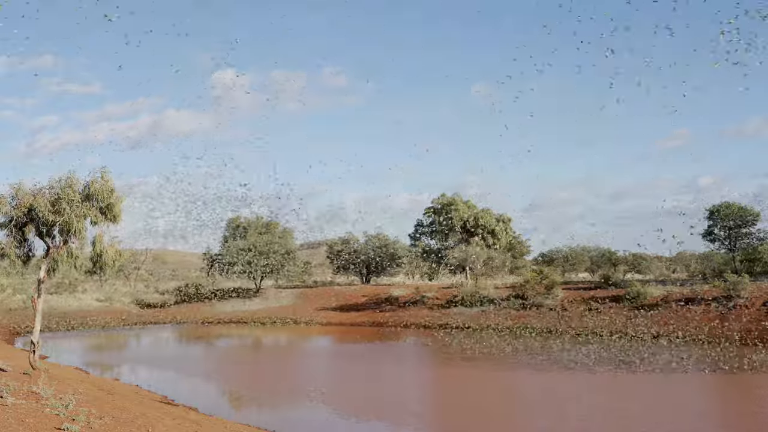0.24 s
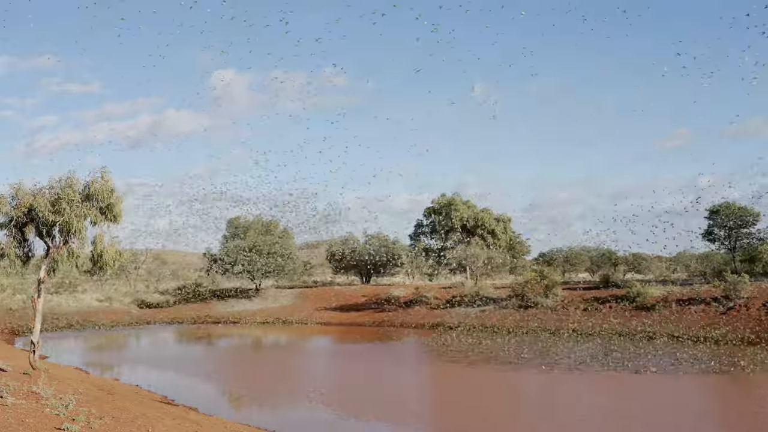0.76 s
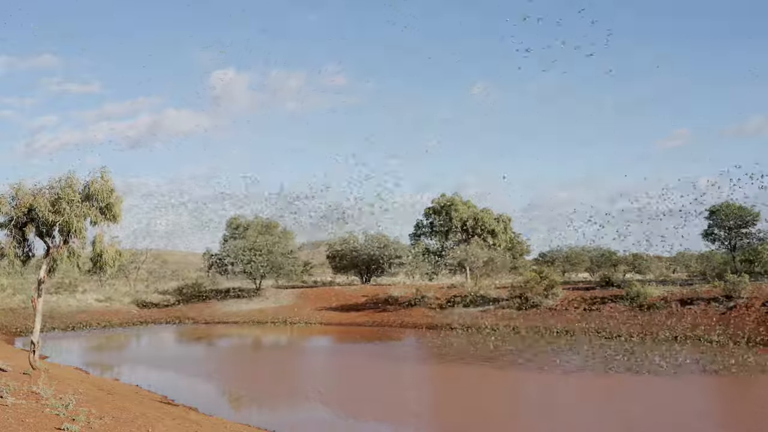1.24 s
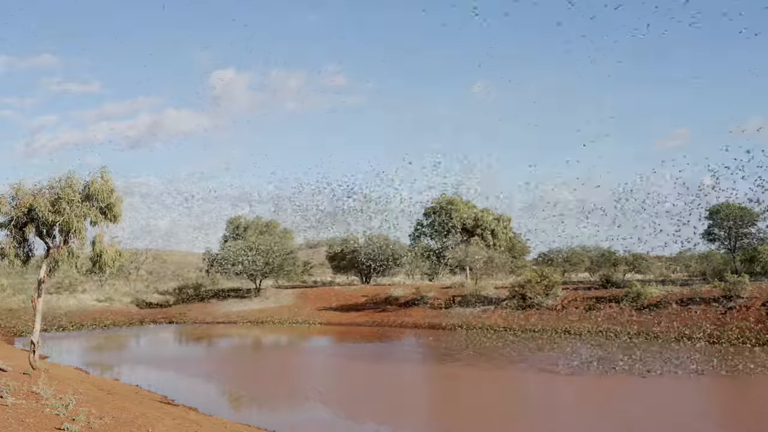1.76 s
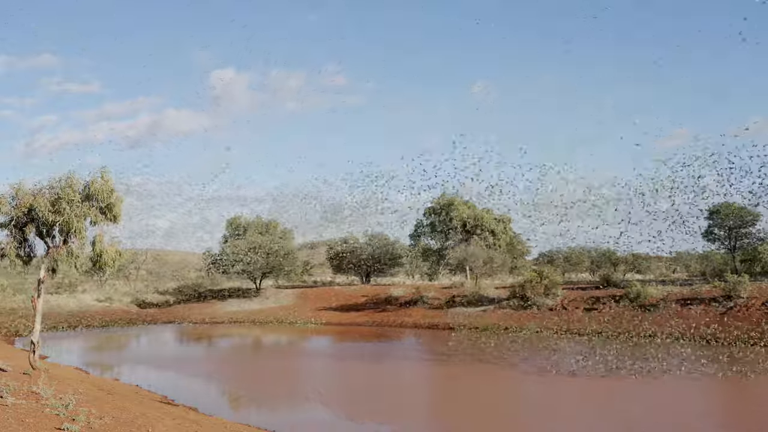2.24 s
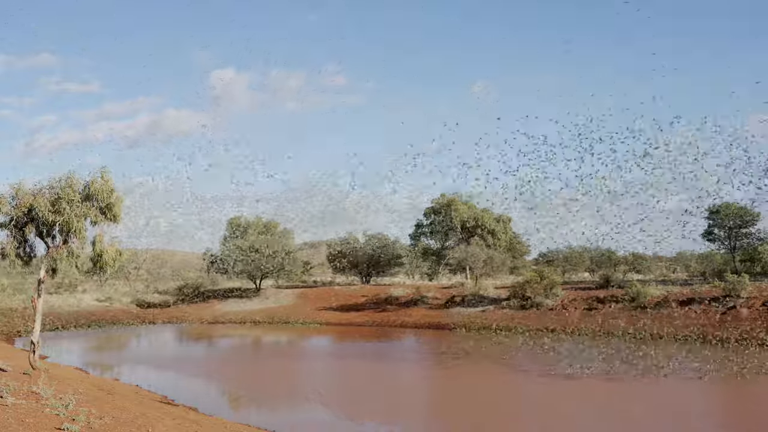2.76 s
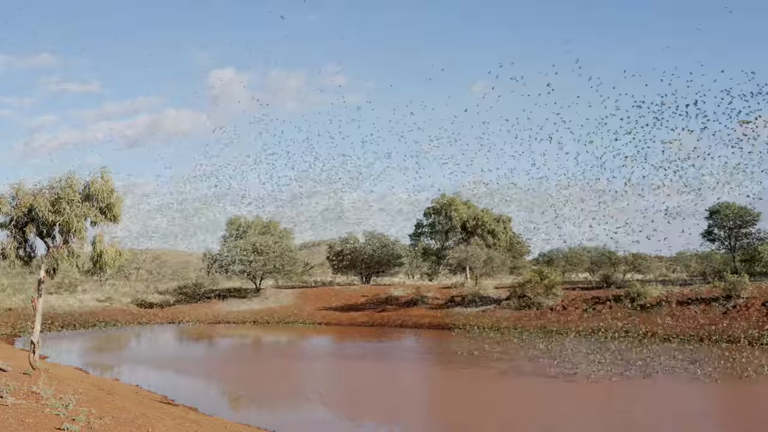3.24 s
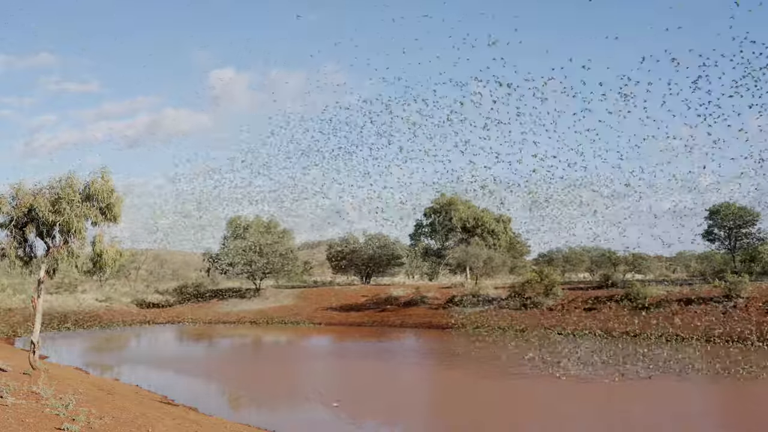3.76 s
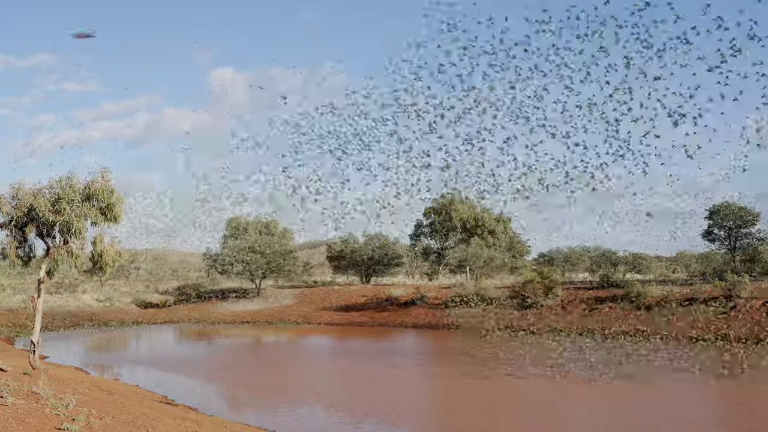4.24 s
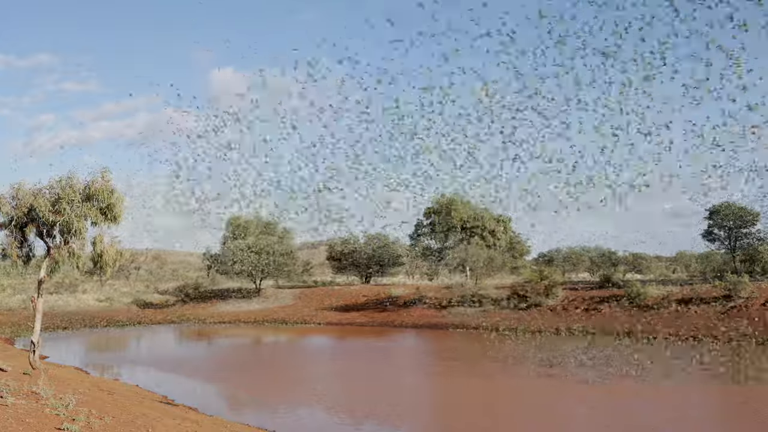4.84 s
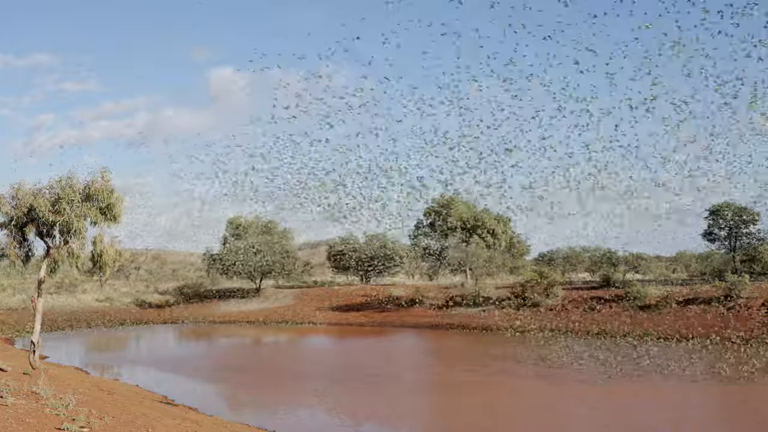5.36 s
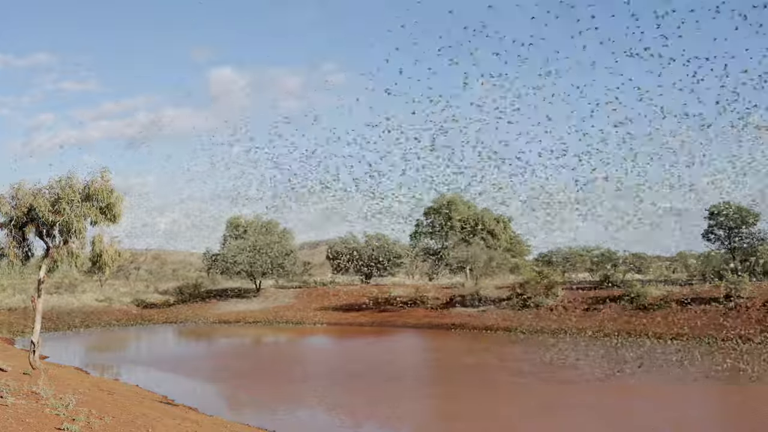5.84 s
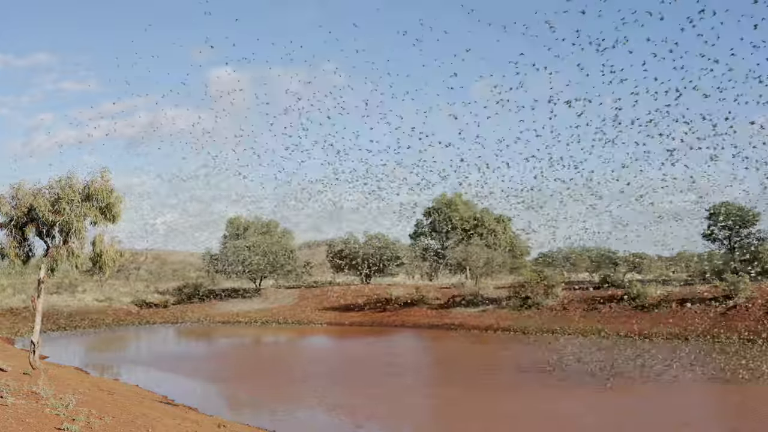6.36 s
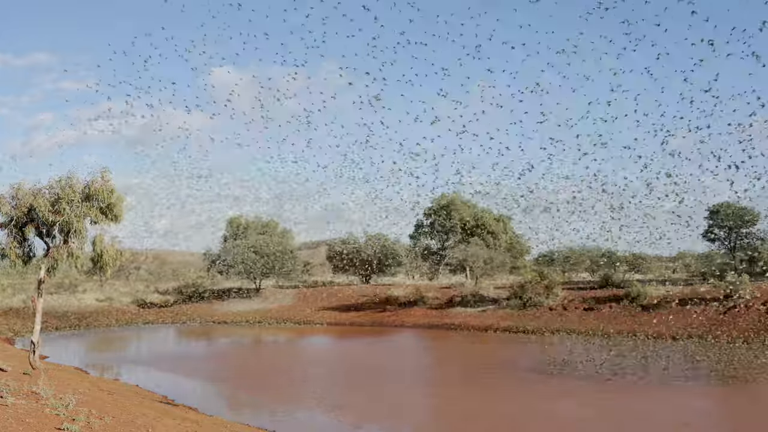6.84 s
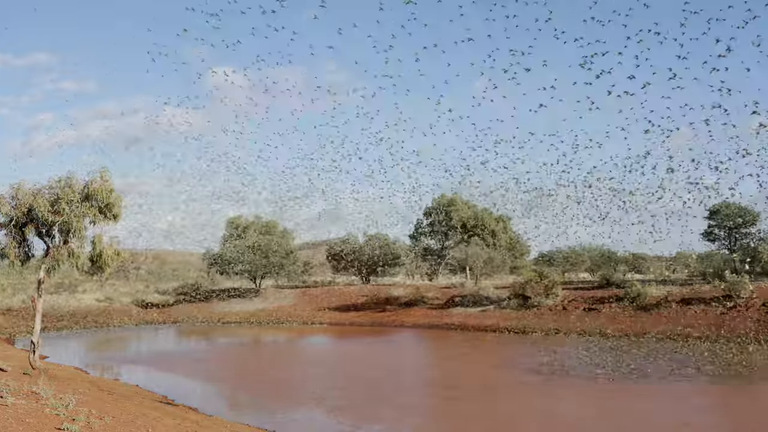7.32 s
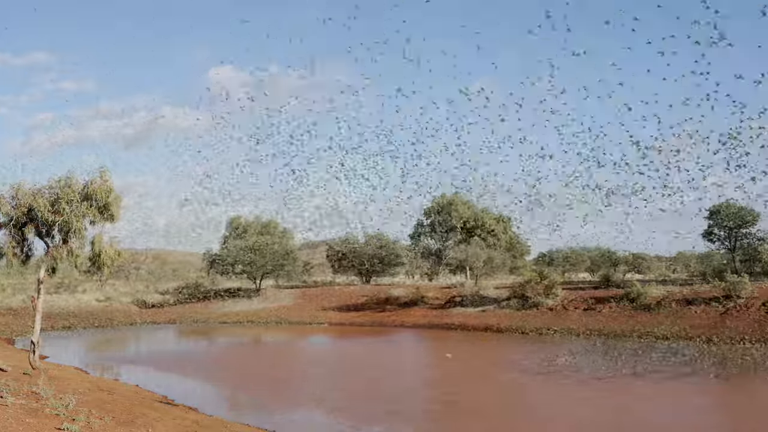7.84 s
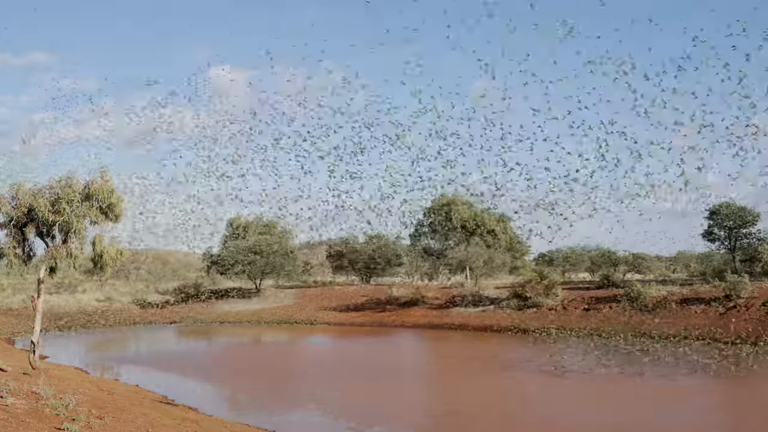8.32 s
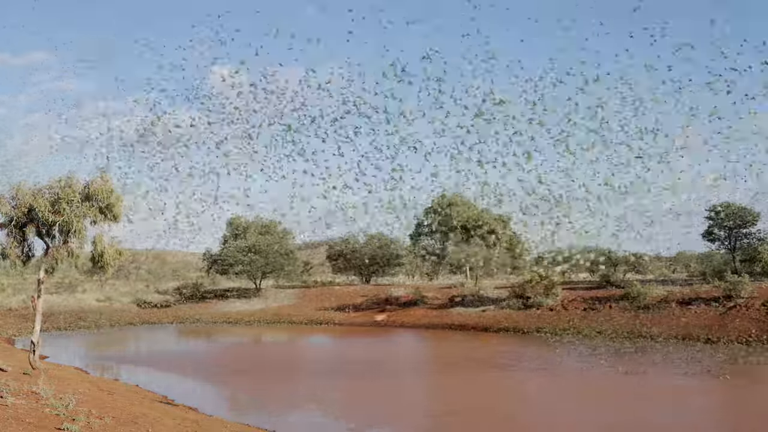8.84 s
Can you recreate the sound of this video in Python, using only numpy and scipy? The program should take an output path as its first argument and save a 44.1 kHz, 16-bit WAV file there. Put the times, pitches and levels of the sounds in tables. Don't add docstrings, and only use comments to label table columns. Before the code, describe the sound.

Continuous roar of a vast bird flock in open country: deep fluttering wing thrum pulsing irregularly, a whirr and breathy rush of air, and countless overlapping high chirps with no single call standing out. Callers drift nearer and brighter early on, dull slightly midway, while the flock banks with a stronger surge of wings. It continues steadily to the end, heard in mono by one small outdoor microphone.

```python
import sys
import numpy as np
from scipy import signal
from scipy.fft import rfft, irfft, next_fast_len
from scipy.io import wavfile
from scipy.ndimage import uniform_filter1d

SR = 44100
rng = np.random.default_rng(int(sys.argv[2]) if len(sys.argv) > 2 else 0)


def gain_from_db(level_db):
    decades = np.asarray(level_db, float) / 20
    return 10 ** decades


def generate_wav(signal):
    frames = np.transpose(np.atleast_2d(signal))
    scaled = np.clip(frames, -1, 1) * 32767
    pcm = np.round(scaled).astype(np.int16)
    wavfile.write(sys.argv[1], SR, pcm)


N = 400869

# (frequency [Hz], density [dB per Hz])
THRUM_SPECTRUM = [(11, -38), (16, -21), (22, -22), (27, -15), (33, -5), (41, -4), (52, 0.5), (64, -2.5),
                  (80, -3.5), (100, -5), (125, -21), (170, -37)]
# (frequency [Hz], density [dB per Hz])
WHIRR_SPECTRUM = [(70, -40), (95, -10.5), (125, 0.5), (160, -3.5), (210, -9.5), (270, -17.5), (340, -28),
                  (450, -62)]
# (frequency [Hz], density [dB per Hz])
RUSH_SPECTRUM = [(160, -4), (280, -1.5), (378, -5), (556, -4.5), (1020, -19), (1330, -22.5), (1600, -25),
                 (2080, -20.5), (3520, -120)]
# (frequency [Hz], density [dB per Hz])
WHISTLE_SPECTRUM = [(800, -20.5), (1200, -19), (1600, -14), (1900, -11), (2200, -10), (2500, -4),
                    (2800, -2), (3050, -1.5), (3350, -2.5), (3600, -4), (3900, -8.5), (4200, -12),
                    (4800, -15.5), (6000, -14.5)]
# (frequency [Hz], density [dB per Hz])
SHRILL_SPECTRUM = [(3300, 4), (4100, -6.5), (4600, -3.5), (5500, -3), (6300, 0.5), (6900, 0), (7500, -5.5),
                   (8400, -12), (10000, -19.5), (12000, -26.5), (13500, -29), (15700, -36), (17000, -45)]
# (time [s], peak level [dB])
NEAR_SNAPS = [
    (1.0565, -47),
    (2.694, -45),
    (3.898, -43),
    (3.931, -43),
    (3.96, -46),
    (4.168, -45),
    (4.1979, -43),
    (4.4034, -44.5),
    (4.4223, -47),
    (5.366, -48),
]
# (time [s], effort [dB])
FLAP_EFFORT = [
    (0, 0.5),
    (1, -.5),
    (1.6, -0.5),
    (3, 0.4),
    (4.2, 0),
    (5.2, 2),
    (5.9, -0.5),
    (8.3, 0.4),
    (9.09, 0.2),
]
# (time [s], swell [dB])
THRUM_SWELLS = [(.06, -1), (.43, 3.5), (.5, -4), (.75, -1), (1.27, -2), (1.36, 4.5), (1.51, 6.5), (2.6, 5),
                (2.74, -3), (2.82, -5), (3.24, -3), (3.29, -7), (3.53, -7), (4.03, 4), (4.1, -5), (4.7, 6),
                (4.78, -3), (4.9, -7), (5.13, 3), (5.32, 8), (5.43, -8), (5.8, 5), (6.37, 5.5), (6.62, -5),
                (7.12, 5.5), (7.57, -10), (7.64, 8.5), (7.96, -4), (8.13, 3), (8.61, 3.5)]
# (time [s], swell [dB])
WHIRR_SWELLS = [(.45, -22), (1.77, -4), (2.33, -6), (2.48, 6.5), (3.11, -4), (3.4, 3), (3.75, -2),
                (4.42, -3), (4.68, 1), (4.89, -5), (5.27, 3.5), (5.4, -2), (5.57, -10), (5.67, 8.5),
                (6.11, -2), (6.61, 2.5), (6.88, -10), (6.99, 3), (7.39, 2), (7.77, -11), (8.27, 2),
                (8.42, -5)]
# (time [s], nearness [dB], open-air treble lift [dB])
CALLER_NEARNESS = [(0, 0.5, -.5), (.5, 1.5, 0.5), (1.1, 1, 0), (1.6, 2.5, .3), (2.35, 2, 3),
                   (2.75, 1.4, 1.8), (3.25, 1.8, 1.5), (3.75, 0, 2), (4.2, -1.6, 1.5), (4.6, -0.9, -1.5),
                   (5.3, -1.5, -0.5), (6.2, -1, -1), (6.5, 0, -1.2), (6.8, 0.5, 0), (7.5, 0.6, .4),
                   (8.0, -0.5, 1), (8.6, -.4, .3), (9.09, 1, -.5)]
# (time [s], rise [dB])
NEAR_CALLS = [(.18, 1), (.75, 2), (1.0, 1), (1.33, 2), (1.59, 2), (1.72, 0.5), (1.84, 1.5), (2.03, 1.5),
              (2.19, 1), (2.35, 2), (3.12, 1), (3.21, 1), (3.62, 1), (3.98, 1), (4.17, 0.5), (4.43, 0.5),
              (4.71, 1.5), (5.07, 1.5), (5.57, 1.5), (5.94, 1), (6.19, 1), (6.37, 1), (6.8, 0), (7.33, 0.5),
              (7.54, 1.5), (8.06, 1.5), (8.25, 1.5), (8.51, 1), (8.68, 1), (9.08, 1)]
# (time [s], fall [dB])
CALL_LULLS = [(.31, -2), (1.92, -1.5), (3.03, -1), (3.69, -1), (4.28, -1.5), (4.96, -1), (5.27, -2),
              (6.09, -1), (6.48, -2.5), (7.59, -1.5), (7.94, -1.5), (8.75, -1.5), (8.99, -2)]

THRUM_DB, WHIRR_DB, RUSH_DB = -18, -25.5, -33
WHIRR_SHARE, RUSH_SHARE = 0.6, 0.3
WHISTLE_DB, SHRILL_DB = -29.5, -33
NEAR_WHISTLE = 0.2
CALL_WHISTLE, CALL_LIFT = 0.13, 0.77
WING_SWELL_S, CALL_SWELL_S = 0.027, 0.036


def evened(x):
    return x / np.sqrt(np.mean(x ** 2) + 1e-20)


def curve(rows, column):
    table = np.array(rows)
    return np.interp(np.arange(N) / SR, table[:, 0], table[:, column])


def swells(rows, half_s):
    t = np.arange(0, N + 64, 64) / SR
    bells = sum(db * np.exp(-((t - s) / half_s) ** 2) for s, db in rows)
    return np.interp(np.arange(N) / SR, t, bells)


def coloured(x, points, smooth_hz):
    size = next_fast_len(N)
    spectrum = rfft(x, size)
    hz = np.fft.rfftfreq(size, 1 / SR)
    broad = uniform_filter1d(abs(spectrum) ** 2, int(smooth_hz * size / SR) + 1)
    point_hz, point_db = np.transpose(points)
    gain = gain_from_db(np.interp(np.log(hz + 1), np.log(point_hz), point_db, -120, -120))
    return evened(irfft(spectrum / np.sqrt(broad + 1e-20) * gain, size)[:N])


def steadied(x, seconds):
    width = int(seconds * SR)
    power = uniform_filter1d(uniform_filter1d(x ** 2, width), width)
    return x / np.sqrt(power + 1e-12)


def scatter(starts, grains):
    size = grains.shape[1]
    at = starts[:, None] + np.arange(size)
    return np.bincount(at.ravel(), grains.ravel(), minlength=N + size)[size:][:N]


def echoed(x, count=7):
    delays, gains = rng.random((count, 2)).T
    total = x.copy()
    for delay, gain in zip(delays, gains):
        total += (0.5 + 0.31 * gain) * np.roll(x, int((0.03 + 0.4 * delay) * SR))
    return evened(total)


def brightened(x, lift_db):
    hz, t, spectrum = signal.stft(x, SR, nperseg=512)
    slope = np.clip((hz[:, None] - 7500) / 4500, 0, 2)
    lift = np.interp(t * SR, np.arange(N), lift_db) * slope
    return signal.istft(spectrum * gain_from_db(lift), SR, nperseg=512)[1][:N]


def feather_snaps(size=260, count=500):
    when, faint = rng.random((count, 2)).T
    near_s, near_db = np.transpose(NEAR_SNAPS)
    start_s = np.r_[near_s, when * N / SR]
    peak_db = np.r_[near_db, -58.5 - 1.6 * np.log(faint + 0.05)]
    decay_db = 60 * np.arange(size) / SR / 0.009
    snaps = gain_from_db(peak_db[:, None] + 2.0 - decay_db) * rng.standard_normal((len(start_s), size))
    train = scatter((start_s * SR).astype(int) + size, snaps)
    return signal.sosfilt(signal.butter(4, 10500, "high", fs=SR, output="sos"), train)


def wing_strokes(count=60):
    t = np.arange(N // 20 + 2) * 20 / SR
    rate, drift_rate, drift_phase, phase = rng.random((count, 4)).T[:, :, None]
    hz = 32 * (1 + 0.22 * (rate - 0.5))
    drift = 1.5 * np.sin(2 * np.pi * (t * (0.3 + 0.9 * drift_rate) + drift_phase))
    stroke = np.cos(2 * np.pi * (hz * t + drift + phase))
    sharpness = 4.0
    puffs = np.exp(sharpness * stroke).sum(0) - count * np.i0(sharpness)
    return evened(signal.resample_poly(puffs, 20, 1)[:N])


def wings():
    puffs = wing_strokes()
    air = rng.standard_normal((3, N))
    rush = steadied(coloured((1 + 0.049 * puffs) * air[2], RUSH_SPECTRUM, 60), 0.16)
    whirr = steadied(coloured(puffs + 12.4 * air[1], WHIRR_SPECTRUM, 43), 0.16)
    thrum = steadied(coloured(puffs + 5.3 * air[0], THRUM_SPECTRUM, 25), 0.14)
    effort_db = curve(FLAP_EFFORT, column=1)
    rush_db = RUSH_DB + RUSH_SHARE * effort_db
    whirr_db = WHIRR_DB + WHIRR_SHARE * effort_db + swells(WHIRR_SWELLS, WING_SWELL_S)
    thrum_db = THRUM_DB + effort_db + swells(THRUM_SWELLS, WING_SWELL_S)
    return gain_from_db(rush_db) * rush + gain_from_db(whirr_db) * whirr + gain_from_db(thrum_db) * thrum


def calls(count=2400, size=2000):
    start, pitch, arch, length, far = rng.random((count, 5)).T[:, :, None]
    u = np.clip(np.arange(size) / SR / (0.0178 + 0.0253 * length), 0, 1)
    hz = (2450 + 1300 * pitch) * (1 + 0.26 * (arch - 0.4) * np.sin(np.pi * u) - 0.0593 * u)
    breath = rng.standard_normal((count, size))
    flutter = evened(uniform_filter1d(breath, size=50, axis=1))
    tone = np.sin(2 * np.pi * np.cumsum(hz * (1 + 0.0454 * flutter), 1) / SR)
    loud = gain_from_db(-1.6 * np.log(far + 0.3))
    shape = np.sqrt(np.sin(np.pi * u) + 1e-9) * (u < 1) * (1 + 0.23 * flutter) * loud
    octave = 1 - 2 * tone ** 2
    at = (start[:, 0] * (N + size)).astype(int)
    first = echoed(scatter(at, shape * tone))
    upper = evened(scatter(at, shape * loud ** 2 * (octave + 1.2 * breath)))
    return first, upper


def chatter():
    first, upper = calls()
    distant = rng.standard_normal((2, N))
    whistle = steadied(coloured(first + 1.6 * distant[0], WHISTLE_SPECTRUM, 25), 0.07)
    shrill = steadied(coloured(upper + 1.8 * distant[1], SHRILL_SPECTRUM, 450), 0.11)
    slow_noise = uniform_filter1d(rng.standard_normal(N), size=800)
    turning = evened(uniform_filter1d(slow_noise, size=800))
    near_db = curve(CALLER_NEARNESS, column=1)
    calls_db = swells(NEAR_CALLS + CALL_LULLS, CALL_SWELL_S)
    lift_db = curve(CALLER_NEARNESS, column=2) + CALL_LIFT * calls_db + 0.45 * turning
    whistle_db = WHISTLE_DB + NEAR_WHISTLE * near_db + CALL_WHISTLE * calls_db
    shrill_db = SHRILL_DB + near_db + calls_db
    return gain_from_db(whistle_db) * whistle + gain_from_db(shrill_db) * brightened(shrill, lift_db)


def scene():
    return (feather_snaps() + wings() + chatter())[None]


def low_pass(x):
    return signal.sosfilt(signal.butter(12, 15720, fs=SR, output="sos"), x)


def record(dry):
    heard = signal.sosfilt(signal.butter(2, 24, "high", fs=SR, output="sos"), dry)
    return low_pass(heard)


dry = scene()
out = record(dry)
generate_wav(out)
```